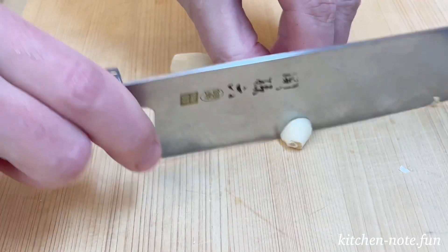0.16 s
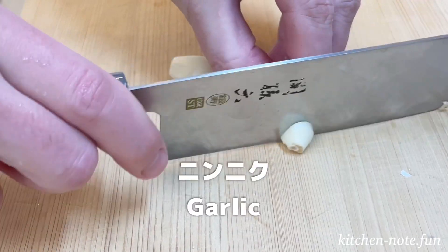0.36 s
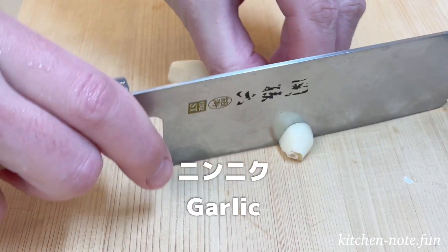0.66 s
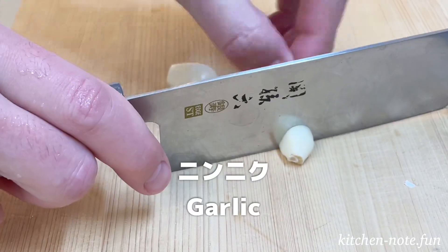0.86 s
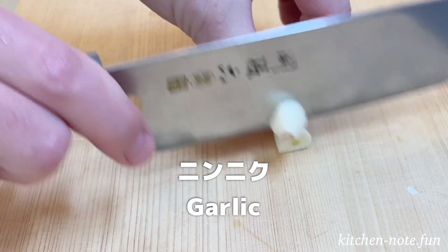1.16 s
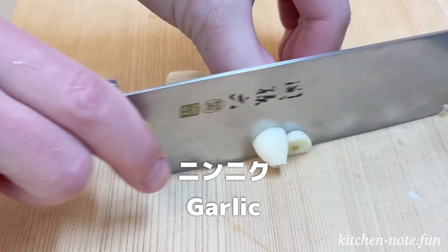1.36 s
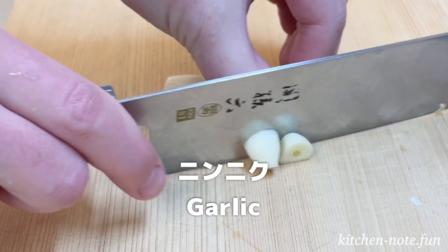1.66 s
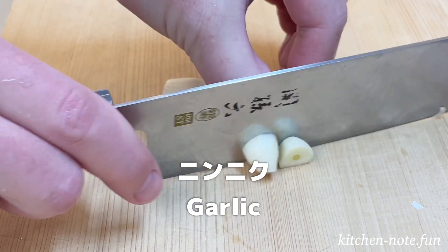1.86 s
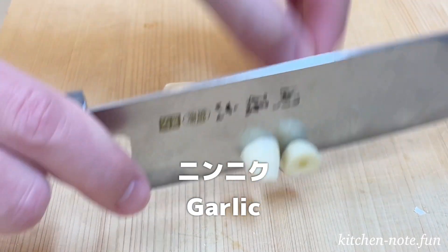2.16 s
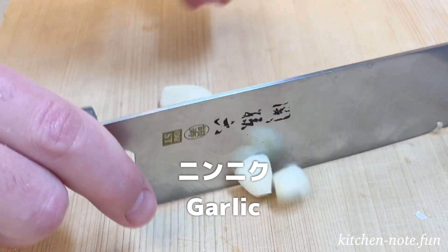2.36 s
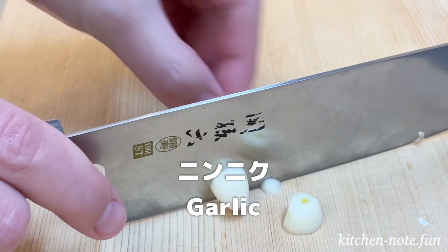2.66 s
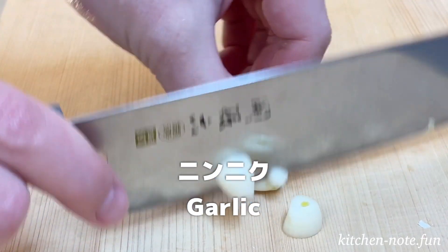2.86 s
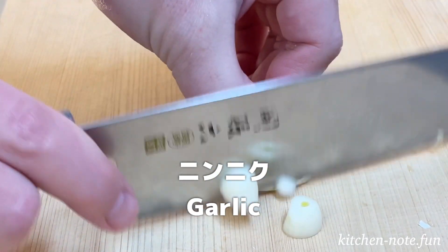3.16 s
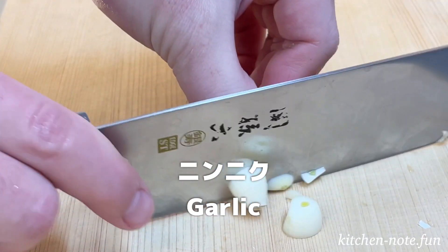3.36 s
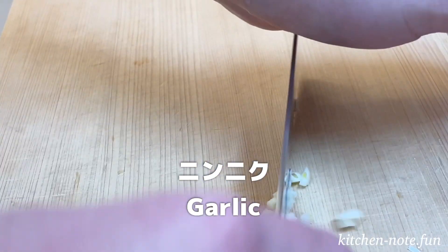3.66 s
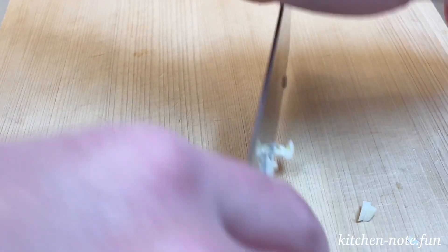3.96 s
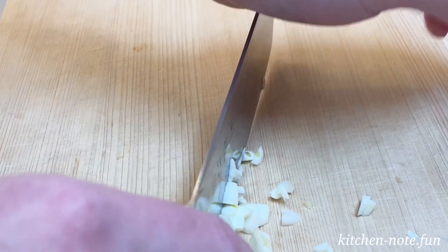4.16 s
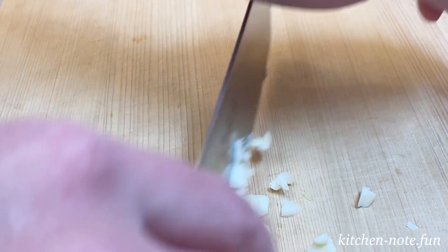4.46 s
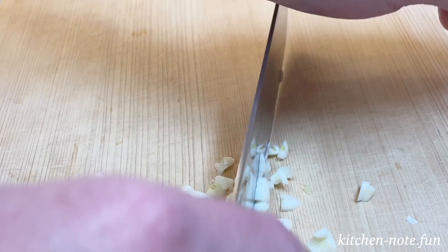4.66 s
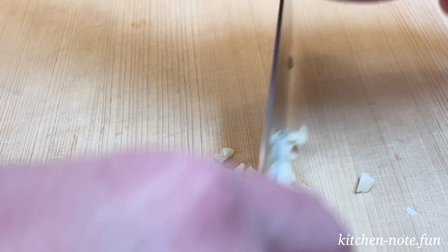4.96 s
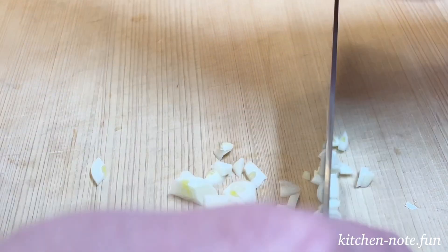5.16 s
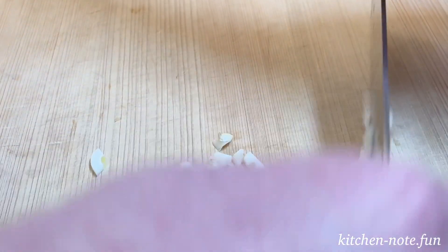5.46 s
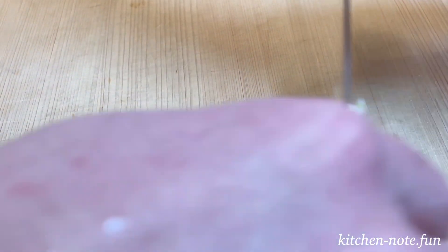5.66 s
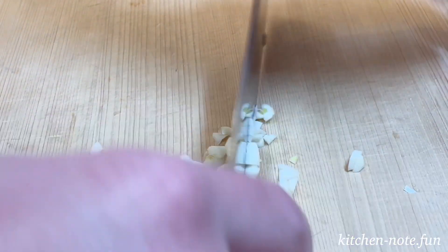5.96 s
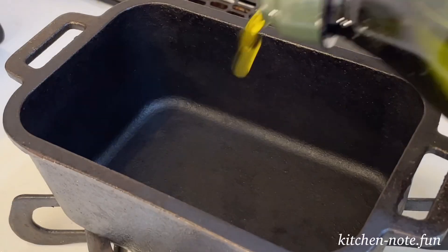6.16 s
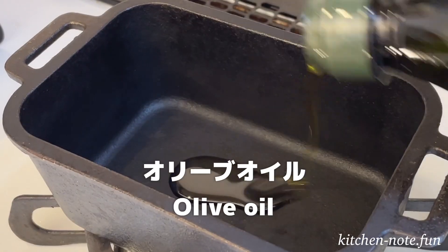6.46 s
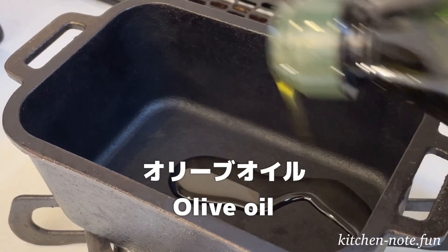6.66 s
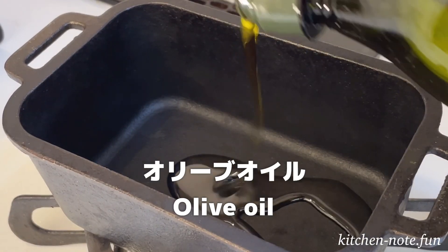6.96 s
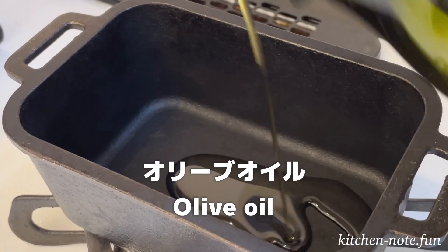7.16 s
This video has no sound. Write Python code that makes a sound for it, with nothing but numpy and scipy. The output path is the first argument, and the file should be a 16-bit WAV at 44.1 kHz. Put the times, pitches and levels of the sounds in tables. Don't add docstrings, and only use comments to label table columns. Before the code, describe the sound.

A close microphone in a small kitchen hears a knife slicing garlic on a wooden board. The tail of an earlier knock is dying as firm, hollow knocks land at about 0.1, 0.3 and 0.6 seconds, then 1.3, 1.6, 2.3, 3.0, 3.3 and 3.5, the last loudest. Each has a crisp crack and a short woody ring from board, counter and walls. Skin snaps and brief flesh hisses precede many of them; small sticky clicks, a faint blade ting near 0.4, light brushing and soft low thumps fill the gaps. At about 3.6 the perspective changes: mincing chops follow roughly every quarter second from 3.8 to 5.9, duller and mostly softer, with moist clicks between. At about 6.1 it cuts abruptly to a much quieter stove: low wavering fan hum near 100 hertz, soft air, and very faint oil trickles and glugs until 7.4.

```python
import sys
import numpy as np
from scipy import signal
from scipy.fft import rfft, irfft, next_fast_len
from scipy.io import wavfile
from scipy.ndimage import uniform_filter1d, minimum_filter1d, map_coordinates

SR = 44100
rng = np.random.default_rng(int(sys.argv[2]) if len(sys.argv) > 2 else 0)


def to_wav(sig):
    pcm = np.clip(np.atleast_2d(sig), -1, 1) * 32767
    pcm = np.round(pcm).astype(np.int16)
    wavfile.write(sys.argv[1], SR, pcm.T)


def level_to_linear(level):
    exponent = np.asarray(level, float) / 20
    return 10 ** exponent


N = 321923
TIME = np.arange(N) / SR
FRONT_S, STOVE_S = 3.568, 6.066

# start in seconds, peak level in dB, then edge, top and ring
# in dB against that peak.
SLICES = [
    (0.073, -4.5, -12, -34, -11),
    (0.301, -5.5, -10.5, -32, -8),
    (0.572, -7.5, -9.5, -46, -6.5),
    (1.331, -6, -11.5, -38, -7),
    (1.617, -4, -16, -36.5, -7),
    (2.332, -6.5, -13, -31.5, -7.5),
    (3.01, -5.5, -12, -24, -7),
    (3.268, -4, -23.5, -26.5, -4.5),
    (3.49, -3, -22.5, -27.5, -6),
]
# start in seconds, peak, edge, top and ring in dB, as above.
CHOPS = [
    (3.451, -12, -25, -45, -16.5),
    (3.803, -11, -32.5, -29.5, -11),
    (4.09, -5.5, -21, -36.5, -16.5),
    (4.342, -6.5, -20, -47.5, -13.5),
    (4.583, -9.5, -33.5, -42, -14.5),
    (4.835, -10.5, -26, -44, -13),
    (5.151, -12, -20, -32, -13.5),
    (5.475, -7, -17.5, -24.5, -14.5),
    (5.715, -9, -26, -45.5, -14),
    (5.923, -15, -25.5, -70, -14),
]
# bass in dB, thud in dB, tip after heel in ms, tip in dB, blade ring in dB.
SLICE_LANDINGS = [(2.5, -3.5, 2.42, -11, 3), (1.5, -2.5, 2.38, -7, -3), (2.5, -4.5, 2.376, -3.5, -8),
                  (4.5, -6, 2.445, -7, 1), (1.5, -6.5, 2.7, -2.5, 2.5), (3.5, -6, 2.35, -9.5, 4),
                  (0, -7, 2.404, -4.5, 5), (1.5, -7, 2.41, -4.5, 0.5), (-2.5, -7.5, 2.46, -10, 0.5)]
# bass in dB, thud in dB, tip after heel in ms, tip in dB, blade ring in dB.
CHOP_LANDINGS = [(-9, 0.5, 3.25, -11, -4), (-8, -1, 3.1, -14, -5), (-1.5, -1, 3.25, -7, 1),
                 (0, -2, 3.24, -9, -12), (0.5, 1, 3.3, -10, -7), (1.5, 0.3, 3.75, -15, -8),
                 (1, 4.5, 3.6, -22, 3), (6.5, -2, 3.3, -7.5, -23), (0, -3, 3.25, -20, 4),
                 (-1.5, 3.5, 3.14, -16, -7)]
FAMILY_HZ = 265, 470, 700, 1330, 2350
SLICE_PLACES = [(-2, 0, 3, 0.1, 1.5), (-2, -2.2, 3, 1.2, 0.6), (1, 0, 3, 0.6, -0.2), (2, 1.5, 2.5, 3.57, 1),
                (-2, 0.8, -3.5, 0.1, 1.9), (0.1, 1, 2.5, 0.1, 2), (2.5, -1.3, 1.5, 2.2, -3),
                (0, -0.5, 0, 0.69, -1), (4, -0.5, -2, 0.1, -0.7)]
CHOP_PLACES = [(-1, 6, 6, -2, -3), (-2.5, 0.1, 0.6, -1.5, -1.5), (1, 0.1, -1.5, 0.1, 4),
               (-3.5, 2.7, 1, -0.8, 5.5), (0.1, 0.5, 0.5, 2, 0.3), (-0.5, 1, -0.5, -1, 2.5),
               (-1.7, -4, 2, -2.5, 4), (-5.5, 1, 1.5, 0, 3), (0.2, 6, -3, 2, 0.1),
               (-1.8, 2.8, -0.8, -1.5, 6.5)]
# delay in ms, level in dB.
REBOUND = [(2.28, -6)]
# delay in ms, level in dB.
SLICE_ECHOES = [(11.5, -19.5), (16.4, -17)]
# delay in ms, level in dB.
CHOP_ECHOES = [(6.5, -27.5), (15.2, -15.5)]
# pitch in Hz, width in Hz, level in dB.
BOARD_SIDE = [(255.7, 71, -0.5), (497, 104, -36), (705, 117.5, -8.5), (945.5, 170, 5), (1140, 200, -31),
              (1349, 274, 9.5), (1849, 68, -10), (2410, 274, -3), (102, 110, -9)]
# pitch in Hz, width in Hz, level in dB.
BOARD_FRONT = [(113.5, 53, -2.5), (261.5, 56, -7), (486.5, 44, -6), (747, 103, 1), (934, 123, 1.5),
               (1104, 60, -4.5), (1416, 71, -4), (2280, 380, 7.5)]
# pitch in Hz, level in dB, 60 dB decay in seconds.
COUNTER_SIDE = [(72.3, -19.5, 0.34), (131, -6, 0.11), (207.5, -7.5, 0.38), (226, -17.5, 0.6),
                (267, -13.5, 0.5), (339.4, -22, 0.82), (423, -11.5, 0.25), (458, -25, 0.71),
                (484.4, -1, 0.13), (610, -26, 0.047), (618, -37.5, 0.41), (693, -27.5, 0.045),
                (729, -13.5, 0.0775), (851, -20.5, 0.56), (940, 5, 0.055), (1000, -17, 0.088),
                (1026, -19.5, 0.35), (1256, -16, 0.13), (1296, 6.5, 0.03), (1343, -23.5, 0.3),
                (1505, -9, 0.15), (1687, -33.5, 0.13), (1952, -11, 0.14), (2260, -14.5, 0.1)]
# pitch in Hz, level in dB, 60 dB decay in seconds.
COUNTER_FRONT = [(72.9, -7.5, 0.53), (119.3, -12, 0.42), (155.6, 5.5, 0.096), (209.8, -8.5, 0.59),
                 (223.3, -9, 0.55), (267.4, -9, 0.53), (333, -9.5, 0.5), (425.5, -1.5, 0.21),
                 (459, -6.5, 0.31), (475.8, 5.5, 0.15), (613.6, -9, 0.23), (637, -8, 0.32), (696, -7, 0.21),
                 (807, -12, 0.5), (917, 3, 0.14), (980, -50, 1), (1017, 1.5, 0.13), (1308, 10.5, 0.042),
                 (1420, -20, 0.15), (1540, -8, 0.08), (2050, -4.5, 0.14)]
# pitch in Hz, level in dB per Hz.
CRACK = [(1060, -20), (1800, 0.5), (3100, -7.5), (4760, -13), (7160, -19.5), (9820, -24.5), (15200, -45),
         (16500, -51.5)]
# pitch in Hz, level in dB per Hz.
WALL_COLOUR = [(24, -27.5), (60, -9.5), (216, 7.5), (680, -13), (887, 1), (1200, -9.5), (1330, -6.5),
               (1580, -9), (2400, -23.5), (6330, -62), (10800, -48), (16500, -77.5)]
# pitch in Hz, 60 dB decay in seconds.
WALL_DECAY = [(60, 0.22), (160, 0.1), (420, 0.44), (1100, 0.27), (3000, 0.32), (8000, 0.65), (15000, 0.12)]

# start in seconds, skin snap in dB,
# hiss at its end in dB, shaking of the board in dB.
CUTS = [(0.029, -44, -34, -43), (0.515, -22, -44.5, -38.5), (1.286, -25.5, -35.5, -43.5),
        (1.573, -32, -40, -40.5), (1.867, -24.5, -52, -40), (2.324, -31, -36.5, -37),
        (2.991, -64, -58, -46.5), (3.221, -35.5, -39, -33), (3.443, -29, -36.5, -37),
        (3.778, -36, -57, -32.5), (4.052, -47, -34.5, -53.5), (4.334, -65, -48, -47), (4.57, -43, -43, -36),
        (4.811, -62, -39, -49), (5.127, -61, -45, -42.5), (5.455, -43, -46, -47),
        (5.708, -59.5, -43.5, -69.5), (5.904, -54, -47, -48)]
# start in
# seconds, length in seconds, skin level in dB, board level in dB.
BRUSHES = [(0.234, 0.078, -57, -49), (1.036, 0.082, -67, -79), (1.21, 0.116, -71, -78),
           (1.372, 0.1, -66, -70), (1.489, 0.071, -67, -75), (1.826, 0.14, -60, -62),
           (2.476, 0.19, -59, -55), (2.647, 0.11, -66, -73), (2.767, 0.026, -51.5, -46.5),
           (2.788, 0.034, -51, -47.5), (3.332, 0.045, -64, -76.5), (3.53, 0.071, -59, -47),
           (4.818, 0.048, -66, -40), (6.217, .1, -79, -82), (6.66, 0.064, -74, -73),
           (6.843, 0.048, -75, -79.5), (7.03, .06, -75, -80), (6.28, .05, -79, -82), (6.48, .07, -79, -80),
           (7.195, .06, -74, -80), (.555, 0.013, -48, -68), (2.665, 0.033, -74, -75)]
# start in seconds, peak level in dB, dullness in dB.
CLICKS = [(0.1444, -42.5, 3), (0.426, -37, 7), (0.647, -33, -7), (0.652, -29, -10), (0.668, -27.5, -4.5),
          (0.901, -38, 8), (1.0674, -63, -3), (1.082, -58, -3), (1.1356, -44, -3), (1.497, -39.5, -10),
          (1.914, -56.5, -4.5), (1.9204, -58, -2.5), (2.0854, -41, 12), (2.826, -44.5, -2),
          (3.123, -45, -4), (3.5633, -40, 1.5), (3.6533, -33, 16), (3.822, -19, 11), (3.896, -31, 14),
          (3.9265, -53.5, 10), (4.183, -32, 11), (4.433, -33, 11.5), (4.67, -30, 13), (4.921, -31.5, 17),
          (5.776, -23.5, -1), (5.9915, -32, -2.5), (6.9388, -56, -7), (7.0315, -52, 1), (7.201, -52, 1),
          (.097, -41, -7), (.2557, -52, -8), (.2606, -45, -7.5), (0.265, -45, -11), (.536, -41, -4),
          (.5615, -42, -1), (1.503, -48, -11), (1.531, -52, -9), (2.5032, -59, -3), (2.5232, -51, -1),
          (5.7815, -31, -1), (5.786, -36, -3), (5.9956, -31.5, 2), (6.0015, -42, -1), (6.943, -58, -7)]
# start in seconds, level in dB.
SLIPS = [(0.03, -48), (0.517, -28), (1.2846, -34.5), (1.3075, -36), (1.5736, -31), (1.869, -38),
         (3.2217, -25), (3.2405, -28), (3.444, -30), (3.7784, -30), (5.1285, -39)]
# start in seconds, level in dB.
CRUMBS = [
    (.668, -36),
    (2.0858, -47),
]
# pitch in Hz, level in dB, 60 dB decay in seconds.
BLADE = [(2930, -20.5, 1.5), (6465, -17, 0.085), (7187, -15, .05), (7500, -23, 0.11), (8021, -18, 0.09),
         (8850, -7, 0.13), (9109, -11, 0.085), (9320, -28, .09), (10120, -26, 0.09), (10680, -23, .07),
         (11530, -28, 0.1)]
# pitch in Hz, width in Hz, level in dB.
STEEL = [(3680, 43, 3.5), (4510, 130, 3), (5190, 120, -2.5), (6290, 121.4, 0.5), (7130, 120, 0),
         (7620, 87, 2.5), (8300, 110, 4), (8950, 93, 3), (9680, 120, 4.5), (10450, 150, 0.5),
         (11160, 140, 4), (14640, 250, 2)]
# pitch in Hz, level in dB per Hz.
SNAP = [(1060, -31), (1800, -27), (2860, -7), (6710, -1), (8390, -11.5), (9290, 2), (13100, -36),
        (15600, -4), (16500, -27)]
# pitch in Hz, level in dB per Hz.
FLESH = [(1060, -24), (1800, 0), (2910, -11), (3110, -3), (3410, -9), (5480, -10), (10800, -12),
         (13000, -17.5), (15200, -14.5), (16000, -21.5), (16500, -24)]
# pitch in Hz, width in Hz, level in dB.
TORN_BOARD = [(260, 90, -4.5), (490, 60, -4), (750, 61, -7.5), (938, 77, -1), (1347, 140, -1),
              (1774, 120, -19.5), (2330, 280, -14.5)]
# pitch in Hz, width in Hz, level in dB.
TAPPED_BOARD = [(260, 90, -9.5), (925, 150, -7.5), (1350, 200, 0.5), (2310, 300, -13.5)]

# time in seconds, rumble level in dB.
LEANING = [
    (0, -47.5),
    (.45, -49),
    (.9, -61.5),
    (1.5, -57),
    (2.16, -54),
    (2.33, -60.5),
    (2.7, -52),
    (3.1, -54.5),
    (6.06, -59.5),
]
# start in seconds, level in dB, then deep, hollow and upper parts in dB.
KNUCKLES = [
    (0.903, -45, -4, 0.5, -4),
    (1.14, -53, 0.5, 1, -22.5),
    (1.166, -50, 2, -12.5, -15),
    (2.089, -40.5, 6, -2.5, 2),
    (2.797, -43.5, 0, -3, -19),
    (3.659, -41.5, 0, -9.5, 1.5),
]
# pitch in Hz, level in dB, 60 dB decay in seconds.
KNUCKLE_TONES = [
    [(78.5, 0.5, 0.203), (127, -3, 0.2)],
    [(219.3, 3.5, 0.31), (273, -2.5, 0.24)],
    [(339, -3.5, 0.32), (495, -12, 0.11), (665, -3, 0.078), (905, -22, .08)],
]
# pitch in Hz, level in dB per Hz.
KNUCKLE_SKIN = [(80, -30), (200, -3.5), (400, 1.5), (750, -9.5), (1400, -20), (3000, -27), (6000, -60.5)]

# pitch in Hz, level in dB per Hz.
BOARD_AIR = [(15, -56.5), (25, -4.5), (208, -4), (245, -4.5), (273, -7), (349, -10.5), (617, -8.5),
             (766, -16.5), (1150, -11), (2040, -19.5), (2210, -17), (3700, -24), (8140, -41), (13600, -47),
             (16500, -74.5)]
# pitch in Hz, level in dB per Hz.
STOVE_AIR = [(15, -57), (25, -33), (74, -3.5), (103, -6.5), (128, -11), (150, -13), (208, -15), (510, -18),
             (979, -19), (1180, -21), (1680, -22.5), (3700, -32.5), (5600, -39), (6300, -44.5),
             (12200, -53), (13600, -53), (16500, -71.5)]
# pitch in Hz, rms level in dB.
BOARD_APPLIANCES = [(215, -63.5), (1168, -69), (2336, -76.5), (3634, -77)]
# pitch in Hz, rms level in dB.
STOVE_APPLIANCES = [(200, -63), (1168, -67), (3634, -81), (15558, -95)]
# pitch in Hz, level in dB per Hz.
WHINE = [(12900, -42), (13150, 5), (13450, 2.5), (13700, -40)]
# time in seconds, pitch in Hz, level in dB.
FAN = [(6.07, 98, -50), (6.19, 97.6, -50), (6.34, 96.2, -48.5), (6.47, 99.8, -45.5), (6.6, 97.4, -48),
       (6.85, 99.9, -49), (6.94, 98.7, -53.5), (7.06, 100.3, -48), (7.3, 92.3, -47.5)]
# middle in seconds, level in dB.
GUSTS = [
    (6.06, -57.5),
    (6.42, -71),
    (6.6, -62.5),
    (6.82, -63.5),
    (7.06, -66),
    (7.3, -52),
]
# middle in seconds, level in dB.
GLUGS = [
    (6.328, -63),
    (6.515, -58),
    (6.705, -61),
    (6.885, -59),
    (7.04, -63),
    (7.21, -64),
]


def unit(x):
    return x / np.sqrt(np.mean(x ** 2) + 1e-20)


def along(points, hz):
    f, v = np.transpose(points)
    return np.interp(np.log(hz + 1), np.log(f + 1), v)


def filtered(x, response):
    m = next_fast_len(len(x) + 8192)
    return irfft(rfft(x, m) * response(np.fft.rfftfreq(m, 1 / SR)), m)[:len(x)]


def noise(spectrum, count=N):
    return unit(filtered(rng.standard_normal(count), lambda hz: level_to_linear(along(spectrum, hz))))


def wobble(rate):
    coarse = TIME[::8]
    knots = rng.standard_normal(int(N * rate / SR) + 4)
    return np.interp(TIME, coarse, map_coordinates(knots, [coarse * rate]))


def add(out, s, sound):
    part = out[round(s * SR):][:len(sound)]
    part += sound[:len(part)]


def resonant(peaks):
    def response(f):
        total = 0
        for k, (centre, width, db) in enumerate(peaks):
            damping = 1j * f * width
            total = total + (-1) ** k * level_to_linear(db) * damping / (centre * centre - f * f + damping)
        return total
    return response


def ringing(modes, t, lag, scatter_db):
    hz, db, t60 = np.transpose(modes)[:, :, None]
    u = np.maximum(t - lag * np.maximum(1 / hz - 1 / 1500, 0), 0)
    sign = (-1) ** np.arange(len(hz))[:, None]
    size = sign * level_to_linear(db + scatter_db * rng.standard_normal(hz.shape) - 60 * u / t60)
    onset = 1 - np.exp(-u * hz / 0.56)
    return np.sum(size * np.sin(2 * np.pi * hz * u) * onset, axis=0)


def swells(events, width_s):
    return sum(level_to_linear(db) * np.exp(-((TIME - s) / width_s) ** 2) for s, db in events)


def appliances(lines, drift):
    out = np.zeros(N)
    for hz, db in lines:
        size = level_to_linear(db + 3.5 + 0.81 * wobble(25))
        pitch = hz + drift * (hz < 9000) * hz * wobble(25)
        out += size * np.sin(2 * np.pi * np.cumsum(pitch) / SR)
    return out


def board_air():
    return level_to_linear(-54.5 + 0.39 * wobble(4.1)) * noise(BOARD_AIR) + appliances(BOARD_APPLIANCES, drift=0.0035)


def counter_rumble():
    size = level_to_linear(np.interp(TIME, *np.transpose(LEANING)))
    u = TIME[:SR // 2] / 0.048
    for blows, sway_db in (SLICES, -49.5), (CHOPS, -36.5):
        for s, db, *_ in blows:
            add(size, s, level_to_linear(0.26 * db + sway_db) * u * np.exp(1 - u))
    groan = noise([(30, -42.5), (60, -12.5), (90, -2.5), (140, -3.5), (200, -40.0), (300, -63.5)])
    return size * level_to_linear(2.0 * wobble(22)) * groan


def wall_tail(seconds):
    hz, t, z = signal.stft(noise(WALL_COLOUR, count=int(seconds * SR)), SR, nperseg=256)
    echo = signal.istft(z * level_to_linear(-60 * t / along(WALL_DECAY, hz)[:, None]), SR, nperseg=256)[1]
    return echo / np.linalg.norm(echo)


def knife():
    fibres = level_to_linear(1.6 * wobble(400) + 1.44 * wobble(90))
    stroke, snaps, cut_shake = cuts()
    brush, brush_shake = brushes()
    skin = [(1200, -25.0), (2500, -3.0), (5300, 1.0), (7200, -2.5), (9500, -1.0), (11000, -6.0),
            (12500, -11.5), (15500, -8.0), (16500, -4)]
    touch = unit(fibres * noise(FLESH)) * stroke
    touch += unit(fibres * noise(skin)) * brush
    touch += snaps + sticky_clicks()
    touch = level_to_linear(-3.0) * filtered(touch, lambda f: 1 + np.abs(resonant(STEEL)(f)))
    grain = unit(filtered(fibres * rng.standard_normal(N), resonant(TORN_BOARD)))
    return touch + grain * (cut_shake + brush_shake) + slips() + blade_ring() + crumbs()


def cuts():
    stroke, snaps, shake = np.zeros((3, N))
    lands = np.array(SLICES + CHOPS[1:])[:, 0]
    for s, snap_db, end_db, board_db in CUTS:
        length = lands[lands > s][0] - s
        if length >= .1:
            length = 0.0095
        u = TIME[:int((length + .05) * SR)]
        hiss = level_to_linear(np.interp(u, [0, length, length + 0.05], [board_db - 10, end_db, end_db - 37]))
        add(stroke, s, hiss + level_to_linear(snap_db - 12.5 - 60 * u / 0.046))
        add(snaps, s, level_to_linear(snap_db - 2.5 - 60 * u / 0.016) * noise(SNAP, count=len(u)))
        add(shake, s, level_to_linear(board_db) * (u < length) * (1 + 0.83 * level_to_linear(-60 * u / 0.011)))
    return stroke, snaps, shake


def slips():
    taps = np.zeros(N)
    for s, db in SLIPS:
        taps[[round(s * SR), round((s + .0022) * SR)]] = level_to_linear(db + 33.5)
    return filtered(taps, resonant(TAPPED_BOARD))


def knocks(blows, landings, places, echoes, board, counter, board_db, walls_db, crack_db, scatter_db, dulling):
    out, t = np.zeros(N), TIME[:int(.5 * SR)]
    short_t = t[:SR // 10]
    wood = [(hz, db, np.log(1000) / (np.pi * width)) for hz, width, db in board]
    arrive = 1 - np.exp(-np.maximum(t - .004, 0) / 0.00077)
    walls = wall_tail(.5)[:len(t)]
    for blow, landing, shares in zip(blows, landings, places):
        s, db, edge_db, top_db, ring_db = blow
        bass_db, thud, tip_ms, tip_db, blade_db = landing
        tip_s = abs(tip_ms) / 1000
        heel = level_to_linear(board_db) * ringing(wood, short_t, lag=1.562, scatter_db=3.5)
        body = np.pad(heel, (0, len(t) - len(heel)))
        add(body, tip_s, level_to_linear(tip_db + board_db) * ringing(wood, short_t, lag=1.59, scatter_db=5.5))
        direct = body.copy()
        for ms, echo_db in echoes:
            add(body, ms / 1000, level_to_linear(echo_db) * direct)
        body += level_to_linear(-22.5 + board_db - 60 * t / 0.02) * np.sin(2 * np.pi * 330 * t)
        ring = [(hz, level + blade_db * (800 < hz < 890), t60) for hz, level, t60 in counter]
        body += level_to_linear(ring_db) * ringing(ring, t, lag=1.605, scatter_db=scatter_db)
        body += level_to_linear(walls_db) * arrive * (walls + 1.11 * wall_tail(.5)[:len(t)])

        colour = [(70, thud + bass_db - 4), (130, thud + bass_db), (190, thud), (490, thud), (660, 0),
                  (1050, 0), (1400, dulling * (edge_db + 8.5)), (1650, edge_db + 8.0)]
        place = [(190, 0), *zip(FAMILY_HZ[:3], shares), (920, 0), *zip(FAMILY_HZ[3:], shares[3:]), (3500, 0)]
        body = filtered(body, lambda f: level_to_linear(along(colour, f) + along(place, f)))

        hard_db = crack_db + 0.3 * (edge_db + top_db) - 0.14 * db
        tilt = [(2600, hard_db + shares[-1] - 2.5), (5000, hard_db), (9000, top_db + 10)]
        dying = level_to_linear(-1 - 60 * t / 0.0036) + level_to_linear(-60 * t / 0.031) + level_to_linear(-14.5 - 60 * t / 0.22)
        add(dying, tip_s, level_to_linear(tip_db + 3.5 - 60 * t / 0.025))
        crack = filtered(noise(CRACK, count=len(t)), lambda f: level_to_linear(along(tilt, f))) * dying
        onset = 1 - np.exp(-t / 0.00061)
        add(out, s + .0001, level_to_linear(db) * (body + level_to_linear(6.5) * crack) * onset)
    return out


def sticky_clicks():
    out, t = np.zeros(N), TIME[:int(.08 * SR)]
    dying = level_to_linear(-60 * t / 0.014) + level_to_linear(-19 - 60 * t / 0.17)
    for s, db, dull_db in CLICKS:
        top_db = -15.5 - 1.96 * dull_db
        colour = [(300, dull_db - 14), (1500, 1.6 * dull_db + 3.0), (2400, dull_db + 4.5), (3500, 1),
                  (7000, -1.9), (11000, top_db), (16000, top_db)]
        add(out, s, level_to_linear(db - 5.5) * noise(colour, count=len(t)) * dying)
    return out


def brushes():
    brush, shake = np.zeros((2, N))
    for s, length, db, board_db in BRUSHES:
        bow = np.sin(np.pi * TIME[:int(length * SR)] / length)
        add(brush, s, level_to_linear(db) * bow)
        add(shake, s, level_to_linear(board_db) * bow)
    return brush, shake


def blade_ring():
    out, t = np.zeros(N), TIME[:int(.088 * SR)]
    steel = sum(level_to_linear(db - 60 * t / t60) * np.sin(2 * np.pi * hz * t) for hz, db, t60 in BLADE)
    add(out, .427, level_to_linear(-34.5) * steel * (1 - np.exp(-t / 0.00175)))
    return out


def crumbs():
    out, t = np.zeros(N), TIME[:int(.088 * SR)]
    for s, db in CRUMBS:
        add(out, s, level_to_linear(db - 60 * t / 0.036) * np.sin(2 * np.pi * 2240 * t))
    return out


def knuckles():
    out, t = np.zeros(N), TIME[:int(.3 * SR)]
    for s, db, *shares_db in KNUCKLES:
        for share_db, modes in zip(shares_db, KNUCKLE_TONES):
            add(out, s, level_to_linear(db + share_db) * ringing(modes, t, lag=0.48, scatter_db=1.5))
        puff = level_to_linear(db + shares_db[-1] - 4.5 - 60 * t / 0.25) * (1 - np.exp(-t / 0.0025))
        add(out, s, puff * noise(KNUCKLE_SKIN, count=len(t)))
    return out


def fan():
    s, *columns = np.transpose(FAN)
    hum_hz, hum_db = [np.interp(TIME, s, column) for column in columns]
    turning = np.cumsum(hum_hz * (1 + 0.013 * wobble(28))) / SR
    hum = level_to_linear(hum_db + 4.5 + 1.0 * wobble(25)) * np.sin(2 * np.pi * turning)
    rough = noise([(150, -38), (205, 4.0), (250, 1.5), (330, -19), (400, -60)])
    return hum + level_to_linear(1.5) * (level_to_linear(-63) + swells(GUSTS, width_s=0.071)) * rough


def oil():
    splash = noise([(600, -10), (900, -2), (1350, -1.0), (1700, -12.5), (2600, -11), (6000, -29), (9000, -60)])
    return level_to_linear(3.0 + 2.1 * wobble(60)) * (level_to_linear(-70) + swells(GLUGS, width_s=.014)) * splash


def stove():
    return fan() + oil() + level_to_linear(-55.0) * noise(STOVE_AIR) + appliances(STOVE_APPLIANCES, drift=0.00284)


def scene():
    board = board_air() + counter_rumble() + knuckles()
    side = knocks(SLICES, SLICE_LANDINGS, SLICE_PLACES, REBOUND + SLICE_ECHOES, BOARD_SIDE, COUNTER_SIDE,
                  board_db=4.0, walls_db=14.0, crack_db=-5, scatter_db=2.33, dulling=.03)
    add(side, 0, level_to_linear(-18.0) * unit(wall_tail(0.98))[int(.22 * SR):])
    front = knocks(CHOPS, CHOP_LANDINGS, CHOP_PLACES, CHOP_ECHOES, BOARD_FRONT, COUNTER_FRONT,
                   board_db=3.5, walls_db=16.0, crack_db=-0.5, scatter_db=2.0, dulling=0.17)
    turn = np.clip((TIME - FRONT_S) / 0.013 + .5, 0, 1)
    board += (1 - turn) * side + turn * front
    places = np.where(TIME < STOVE_S, board, stove())
    fade = np.clip(np.abs(TIME - STOVE_S) / 0.0052 - .2, 0, 1)
    return (fade * (places + knife() + level_to_linear(-87.5) * noise(WHINE)))[None]


def band_limit(x):
    return signal.sosfilt(signal.butter(12, 16790, fs=SR, output="sos"), x)


def record(dry):
    def microphone(f):
        bass_cut = (1j * f / 55) ** 2 / (1 + 1.2j * f / 55 - (f / 55) ** 2)
        return bass_cut / np.sqrt(1 + (f / 15850) ** 190)
    heard = filtered(dry[0], microphone)
    need = np.minimum(1, .92 / np.maximum(np.abs(heard), 1e-6))
    held = minimum_filter1d(need, size=161)
    gain = uniform_filter1d(uniform_filter1d(held, size=80), size=80)
    return band_limit((heard * gain)[None])


dry = scene()
out = record(dry)
to_wav(out)
```